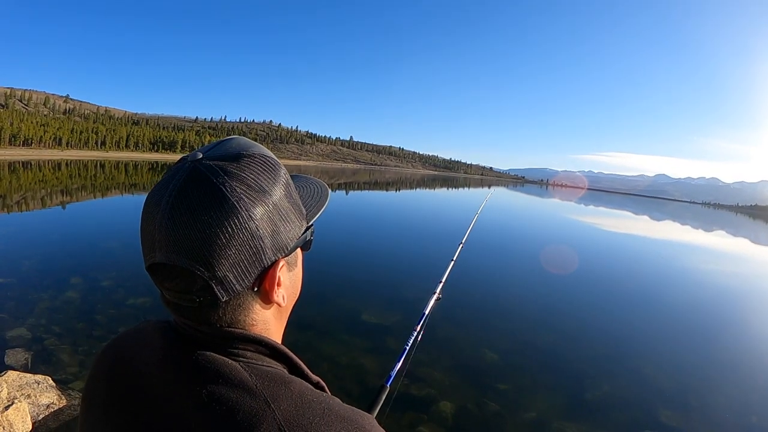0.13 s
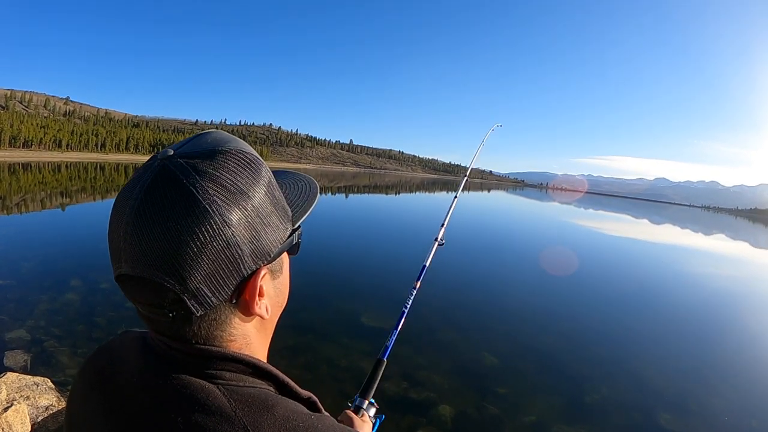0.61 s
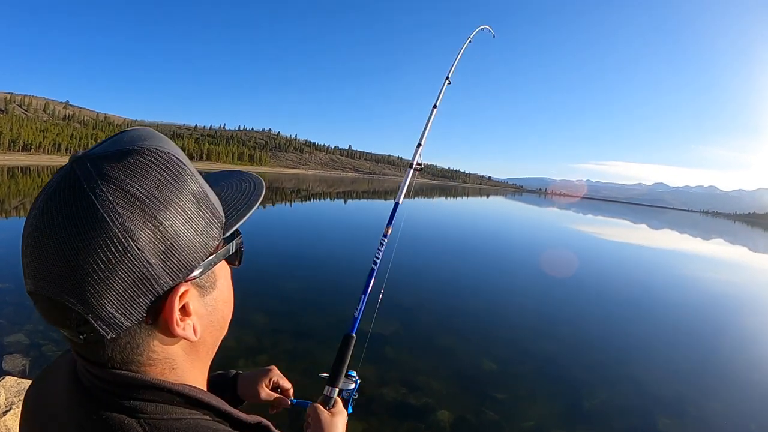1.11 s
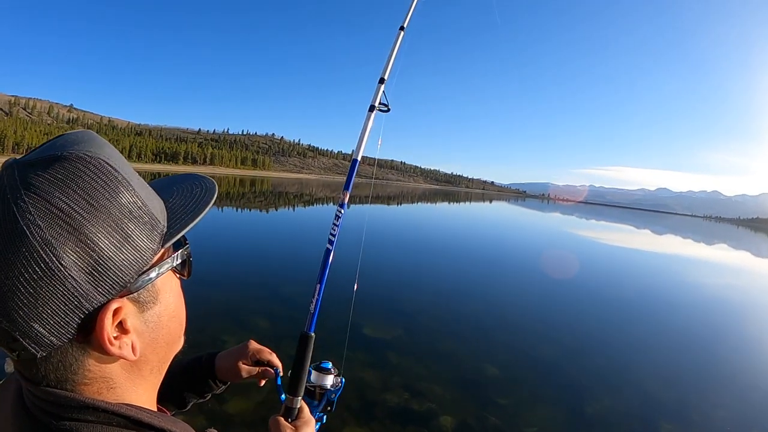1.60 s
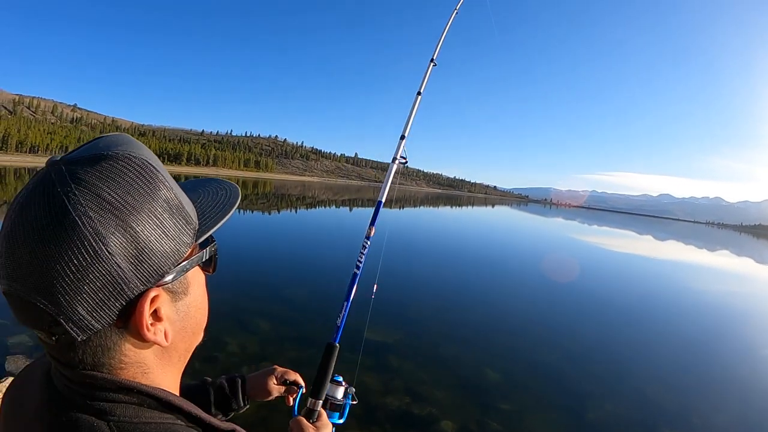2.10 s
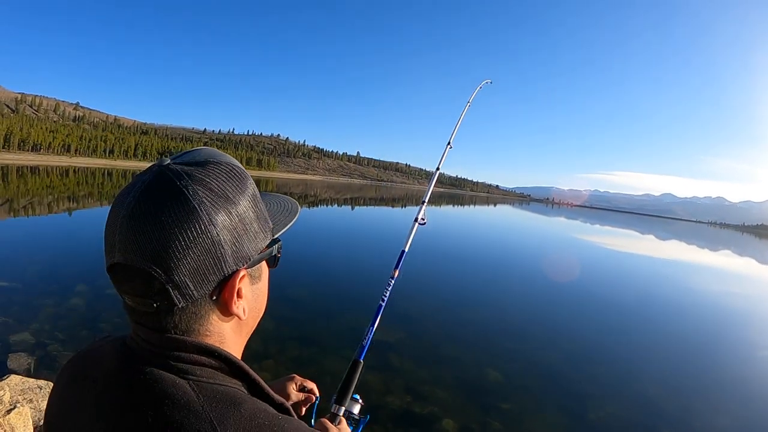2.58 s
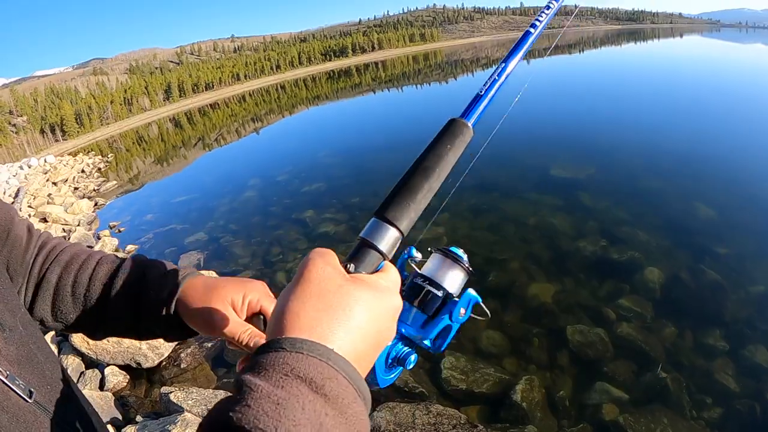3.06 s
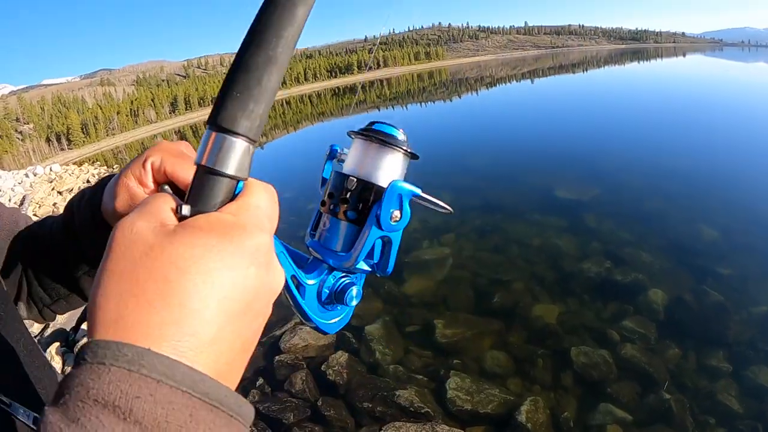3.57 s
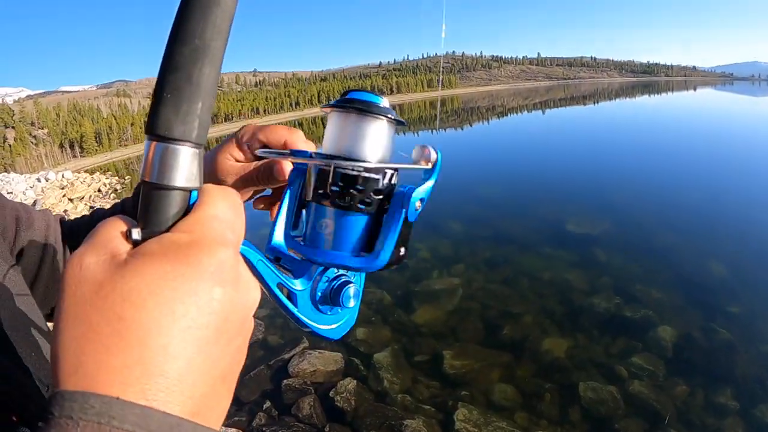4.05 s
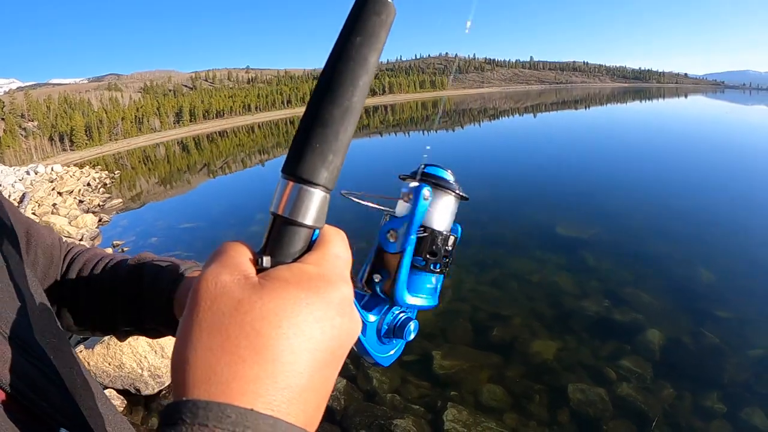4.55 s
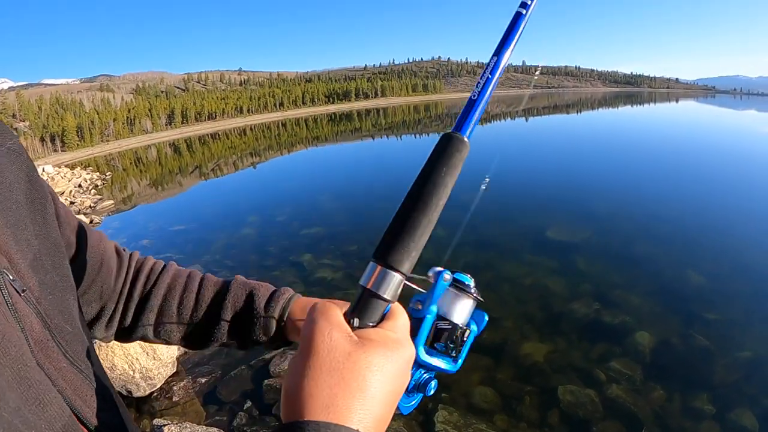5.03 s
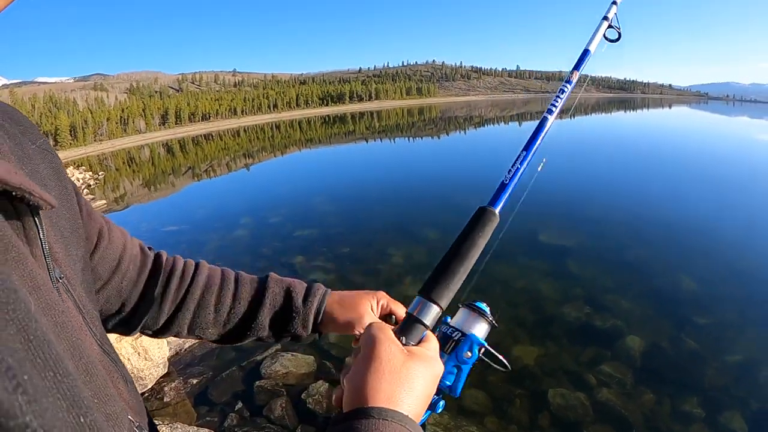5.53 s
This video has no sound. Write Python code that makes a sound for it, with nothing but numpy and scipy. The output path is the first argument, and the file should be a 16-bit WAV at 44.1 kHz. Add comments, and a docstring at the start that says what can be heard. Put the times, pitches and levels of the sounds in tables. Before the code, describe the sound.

By a calm lake, a spinning reel's drag clicker buzzes in two softer runs, a little distant, with dull sleeve rubbing. Small knocks follow, then the sound jumps close: two louder, brighter metallic runs with ringing and scraping. Afterwards a brief singing rub fades, and hands rustle and crank with light rattles and clicks. The microphone is close, slightly boxy, over quiet outdoor hush.

```python
"""A fishing reel's drag clicker sounds as a fish pulls line in four runs by a calm lake: its spring snaps over
the teeth of the turning spool, a struck resonator of bell, body and treble modes. The spring also scrapes and
squeals around each slip. The listening point is close to the reel from halfway on. Hands rub and crank
(shaped noise, short pings and knocks), with low rumble and one singing rub, over a quiet shore hush."""
import sys
import numpy as np
from scipy import signal
from scipy.io import wavfile
from scipy.ndimage import uniform_filter1d

SR = 44100
rng = np.random.default_rng(int(sys.argv[2]) if len(sys.argv) > 2 else 0)


def to_linear_factor(level_db):
    """Convert decibel levels (scalar or array-like) to linear amplitude factors."""
    exponent = np.asarray(level_db, float) / 20
    return 10 ** exponent


def inscribe(sig):
    """Save sig as 16-bit PCM at rate SR to the path in sys.argv[1].

    A 1-D sig is mono; a 2-D sig holds one channel per row.
    Samples are clipped to [-1, 1] before scaling.
    """
    pcm = np.round(np.clip(np.atleast_2d(sig).T, -1, 1) * 32767)
    wavfile.write(sys.argv[1], SR, pcm.astype(np.int16))


N = 249243


def read(points, hz):
    """Spectral interpolation: joins (f/Hz, value) points on a log-frequency axis."""
    f, value = np.transpose(points)
    return np.interp(np.log(hz + 1), np.log(f + 1), value)


def evened(x):
    """Normalisation of power: scales to rms 1."""
    return x / np.sqrt(np.mean(x ** 2) + 1e-20)


def add(mix, s, sound):
    """Superposition: adds a sound at a time in seconds."""
    part = mix[round(s * SR):][:len(sound)]
    part += sound[:len(part)]


def causal(points, size=2048):
    """Minimum phase: the Hilbert transform of the log gain gives the impulse response of a spectrum."""
    log_gain = np.log(to_linear_factor(read(points, abs(np.fft.fftfreq(4 * size, 1 / SR)))))
    return np.fft.ifft(np.exp(np.conj(signal.hilbert(log_gain)))).real[:size]


def noise(points, patchy_db, flicker_db, size):
    """Spectral shaping of Gaussian noise, with drifting patches and wide-band flicker; rms 1."""
    frames, hz = 4 * N // size + 5, np.fft.rfftfreq(size, 1 / SR)
    a, b, patches = rng.standard_normal((frames, len(hz), 3)).T
    patches = uniform_filter1d(patches, size=6, axis=0)
    patches = evened(uniform_filter1d(patches, size=8, axis=1))
    flicker = evened(uniform_filter1d(rng.standard_normal(frames), size=4))
    level_db = read(points, hz)[:, None] + patchy_db * patches + flicker_db * flicker
    z = (a + 1j * b) * to_linear_factor(level_db)
    return evened(signal.istft(z, nperseg=size, noverlap=3 * size // 4)[1][:N])


def narrow_band(hz, width_hz, edge_db):
    """Resonance curve: a spectral peak that falls to edge_db one width away on either side."""
    return [(hz - 8 * width_hz, -80), (hz - width_hz, edge_db), (hz, 0),
            (hz + width_hz, edge_db), (hz + 8 * width_hz, -80)]


# spectrum of the quiet shore: (f/Hz, relative level/dB)
HUSH_SPECTRUM = [(90, -22.5), (160, 10.5), (400, 0), (900, -10.5), (4500, -15.5), (16000, -29)]


def hush():
    """Stationary broadband noise: the quiet hush of the shore."""
    return to_linear_factor(-62) * noise(HUSH_SPECTRUM, patchy_db=1.5, flicker_db=4, size=1024)


# spectrum of the low handling rumble: (f/Hz, relative level/dB)
RUMBLE_SPECTRUM = [(20, -16), (45, -8), (100, 5), (130, -17.5), (300, -47)]


def rumble():
    """Low-frequency noise under a gain of 0.3, raised to full from about 2.6 s to 4.4 s, then lowered again."""
    t = np.arange(N) / SR
    gain = np.clip(np.minimum(t - 2.4, 4.6 - t) / .2, .3, 1)
    return to_linear_factor(-61) * noise(RUMBLE_SPECTRUM, patchy_db=2, flicker_db=4, size=2048) * gain


# strokes of hands and sleeves; rise and fall span 20 dB:
# (peak t/s, rise/s, fall/s, rustle level/dB, thud level/dB)
HAND_STROKES = [(.1, 0.75, 0.42, -58.5, -74.5), (.72, 0.99, 0.48, -49, -52), (1.03, .04, 0.068, -52, -50.5),
                (1.78, .3, 0.75, -59.5, -59), (2.31, 0.18, 4.5, -57.5, -53.5), (2.5, 0.16, 0.8, -50, -51),
                (2.728, 0.24, 1.34, -47.5, -50), (2.92, 0.9, 14, -64.5, -54.5),
                (3.463, 0.1, 0.22, -54, -47.5), (3.587, 0.09, 0.012, -45, -64),
                (3.81, 0.033, 0.051, -88, -51.5), (4.09, 0.39, 0.7, -57, -46), (4.548, 0.8, 1.8, -58, -70),
                (4.801, 0.14, 0.13, -51, -66), (4.93, .15, 1, -52, -55), (5.08, 0.33, 1.04, -58, -54),
                (5.25, 0.25, 0.16, -53, -50.5), (5.36, 0.24, 0.25, -53.5, -53),
                (5.49, 0.31, 0.83, -55, -55.5)]


def stroke_gains():
    """Exponential envelopes: each stroke swells and dies away, the strongest one ruling; rustle and thud gains."""
    peak, rise, fall, rustle_db, thud_db = np.transpose(HAND_STROKES)[:, :, None]
    t = np.arange(0, N + 64, 64) / SR
    shape_db = -20 * np.maximum((peak - t) / rise, (t - peak) / fall)
    return [np.interp(np.arange(N) / SR, t, to_linear_factor(db + shape_db).max(0)) for db in (rustle_db, thud_db)]


# spectrum of the brighter rubbing, also of the rattles: (f/Hz, relative level/dB)
RUSTLE_SPECTRUM = [(400, -52.5), (800, -7.5), (1350, 4.5), (1800, 1), (3000, -3.5), (3700, -4),
                   (4600, -4.5), (6000, -8), (10500, -18), (16000, -34)]


def rattles(count=24):
    """Shot noise: random impulses, in clumps, set off short pings of gears and bail at scattered pitches."""
    out, t = np.zeros(N), np.arange(SR // 50) / SR
    clump = to_linear_factor(7 * evened(uniform_filter1d(rng.standard_normal(N), size=SR // 30)))
    for hz in np.geomspace(1250, 11000, count):
        struck = rng.random(N) < 7 * clump / SR
        train = struck * to_linear_factor(3 * np.minimum(rng.exponential(size=N), 3))
        ping = np.sin(2 * np.pi * hz * t) * t * to_linear_factor(-60 * t / 0.016)
        out += to_linear_factor(read(RUSTLE_SPECTRUM, hz)) * signal.oaconvolve(train, ping)[:N]
    return evened(out)


# spectrum of the duller rubbing: (f/Hz, relative level/dB)
SLEEVE_SPECTRUM = [(350, -19), (600, -6.5), (1000, 5.5), (1500, 10.5), (2500, -3), (4500, -7.5),
                   (6500, -7.5), (10500, -29), (16000, -32.5)]


def rustle():
    """Friction noise: dull rubbing until 3.2 s and brighter after, with rattles of the cranked reel."""
    t = np.arange(N) / SR
    sleeve = noise(SLEEVE_SPECTRUM, patchy_db=3.2, flicker_db=3.5, size=512)
    bright = noise(RUSTLE_SPECTRUM, patchy_db=1.6, flicker_db=1.5, size=256)
    cranking_db = np.where(t > 4.72, -1.5, -8)
    return np.where(t < 3.2, sleeve, bright) + to_linear_factor(cranking_db) * rattles()


# spectrum of the low thudding: (f/Hz, relative level/dB)
THUD_SPECTRUM = [(90, -17), (170, 6.5), (320, 4.5), (500, 2), (750, -9), (1500, -30.5)]


def thuds():
    """Structure-borne noise: the low thudding under the hands."""
    return noise(THUD_SPECTRUM, patchy_db=2.5, flicker_db=2.5, size=1024)


def hands():
    """Amplitude modulation: the strokes govern rustle and thudding."""
    rubbing, thudding = stroke_gains()
    return rubbing * rustle() + thudding * thuds()


# the four runs of the fish, one curve each, first tooth at the first row:
# (t/s, spool speed/(teeth/s), nominal snap level/dB, rms over its first 8 ms)
FISH_RUNS = [
    [(0.0992, 16.45, -44.0), (0.189, 6.09, -42.0), (0.224, 37.42, -44.0), (0.304, 25.16, -46.0),
     (0.339, 55.58, -39.0), (0.354, 65.3, -43.0), (0.559, 58.8, -42.0), (0.629, 81.82, -42.0),
     (0.669, 76.49, -42.0), (0.744, 88.09, -38.0), (0.809, 65.86, -40.0), (0.939, 78.1, -37.0),
     (0.974, 62.88, -36.0), (1.014, 48.2, -43.0), (1.039, 39.69, -37.0), (1.099, 31.61, -39.0),
     (1.119, 28.84, -37.0), (1.1903, 15.02, -37.0)],
    [(1.4103, 17.18, -36.0), (1.44, 38.22, -37.0), (1.49, 65.85, -31.0), (1.54, 60.87, -37.0),
     (1.63, 29.73, -31.0), (1.725, 15.22, -39.0), (1.78, 26.93, -32.0), (1.8, 38.02, -37.0),
     (1.89, 55.53, -34.0), (1.91, 63.78, -36.0), (2.0296, 3.01, -39.0)],
    [(2.9359, 33.19, -33.0), (2.986, 43.78, -26.0), (3.066, 56.95, -27.0), (3.101, 45.07, -30.0),
     (3.166, 30.19, -24.0), (3.231, 52.5, -29.0), (3.281, 42.36, -29.0), (3.331, 47.68, -20.0),
     (3.391, 34.59, -29.0), (3.4297, 20.98, -26.0)],
    [(3.9032, 6.09, -27.0), (3.968, 45.89, -22.0), (4.038, 88.33, -27.0), (4.058, 86.66, -21.0),
     (4.078, 95.66, -23.0), (4.143, 101.92, -22.0), (4.158, 89.07, -27.0), (4.263, 93.49, -23.0),
     (4.373, 59.13, -26.0), (4.398, 43.58, -22.0), (4.4649, 15.01, -25.0)],
]
# ringing in each run, as grip and angle of the reel change: (bell level/dB, bell drift/(dB/s),
# treble level/dB, treble drift/(dB/s), share of a turn at which the rim modes are loudest)
RINGING_OF_RUN = [(-59, -21.5, -48.5, 12, 0.75), (-52.5, 5, -46, 0, 0.032), (-44.5, 12.5, -29, -6, 0.41),
                  (-36.5, 2.5, -31, -6, 0.85)]
# body of the snap in each run: (crack level/dB, share of a turn at which the crack is fullest,
# rim level/dB, rim drift/(dB/s))
BODY_OF_RUN = [(3.5, .03, -0.5, -10), (-3, 0.74, 0.5, -2), (-2, 0.7, 0.5, 19), (1.5, 0.17, 2.5, 4.5)]
# lone snaps outside the even turning, the first an extra bounce of the spring between two teeth: # (t/s, snap
# level/dB, bell level/dB, treble level/dB)
LONE_SLIPS = [(.3971, -49, -54, -62), (2.5042, -36.5, -42, -36.5), (2.6517, -39.5, -42, -45)]
TEETH_PER_TURN, RIM_SWELL_DB, CRACK_SWELL_DB = 13.4, 5, 6  # rim and crack swell and sink once a turn
FOLLOW = 0.29  # share of a snap's excess over the mean of its run that bell and treble follow


def teeth():
    """Integrated speed: each whole tooth passed is a slip; rows (t/s, snap, bell, treble, rim, crack/dB)."""
    rows = [np.pad(LONE_SLIPS, ((0, 0), (0, 2)))]
    for run, ringing, body in zip(FISH_RUNS, RINGING_OF_RUN, BODY_OF_RUN):
        bell_db, bell_drift, treble_db, treble_drift, rim_full = ringing
        crack_db, crack_full, rim_db, rim_drift = body
        knots, speeds, levels = np.transpose(run)
        t = np.arange(knots[0], knots[-1], 1 / SR)
        passed = np.cumsum(np.interp(t, knots, speeds)) / SR
        s = np.interp(np.arange(int(passed[-1]) + 1), passed, t)
        db = np.interp(s, knots, levels)
        excess = FOLLOW * (db - db.mean())
        from_mean_s = s - s.mean()
        turns = np.arange(len(s)) / TEETH_PER_TURN
        bell = bell_db + bell_drift * from_mean_s + excess
        treble = treble_db + treble_drift * from_mean_s + excess
        rim = rim_db + rim_drift * from_mean_s + RIM_SWELL_DB * np.cos(2 * np.pi * (turns - rim_full))
        crack = crack_db + CRACK_SWELL_DB * np.cos(2 * np.pi * (turns - crack_full))
        rows.append(np.transpose([s, db, bell, treble, rim, crack]))
    return np.concatenate(rows)


# crack of the spring beside the modes: (f/Hz, relative level/dB from afar, relative level/dB close by)
SNAP_SPECTRUM = [(624, 0.5, -4), (950, 14.5, 21.5), (1590, 25, 24), (2370, 21, 26), (4920, 18.5, 29.5),
                 (6040, 19.5, 8.5), (9860, 9, 16), (17000, 5, -9.5)]
CLOSE_FROM_S = 2.75  # the reel is heard from afar before this and close by after


def snap_of(close):
    """Impulse response: the broadband crack of the spring, from afar or close by."""
    hz, far_db, close_db = np.transpose(SNAP_SPECTRUM)
    return causal(np.transpose([hz, close_db if close else far_db]))


RIM_HZ = (3800, 4300)  # modes between these belong to the rim


def ring(modes, close, chance, spread_db, rim_db=0, detune=.0015):
    """Modal superposition: decaying sines, each strike exciting and tuning them a little differently."""
    t = np.arange(SR // 6) / SR
    hz, far_db, close_db, t60 = np.array(modes).T[:, :, None]
    level_db = (close_db if close else far_db) + spread_db * chance[:len(hz), None] - 60 * t / t60
    level_db = level_db + rim_db * ((hz > RIM_HZ[0]) & (hz < RIM_HZ[1]))
    sign = (-1) ** np.arange(len(hz))[:, None]  # neighbours start opposed, so close pairs swell before they die
    tuned_hz = hz * (1 + detune * chance[-len(hz):, None])
    return (sign * to_linear_factor(level_db) * np.sin(2 * np.pi * tuned_hz * t)).sum(0)


# modes of spool and spring: (f/Hz, relative level/dB from afar, relative level/dB close by, decay t60/s)
REEL_MODES = [(1702, 7, 0, 0.13), (1457, -17, -48, 0.04), (2395, -10, -10, 0.0055), (3280, -17, -12, 0.028),
              (3960, 1, 3, 0.012), (4120, -6.5, 8, 0.019), (4600, -29, 12, 0.0068), (5290, 4, 5, 0.0084),
              (5880, -8.5, 0, 0.012), (7450, -5.5, -16, 0.0064), (9650, -2.5, -37, 0.0037),
              (10420, -15, -12, 0.014), (10255, 1.5, 2, 0.0031), (12040, 3.5, -32.5, 0.0036),
              (13550, -9, -9, 0.009)]
BELL, BODY, TREBLE = REEL_MODES[:1], REEL_MODES[1:10], REEL_MODES[10:]


def through_reel(x, close, body_db, treble_db):
    """Source-filter principle: passes an excitation through the body and treble modes of the reel."""
    body, treble = (ring(modes, close, np.zeros(20), spread_db=0) for modes in (BODY, TREBLE))
    colour = to_linear_factor(body_db) * body / np.linalg.norm(body)
    colour += to_linear_factor(treble_db) * treble / np.linalg.norm(treble)
    return signal.oaconvolve(x, colour)[:N]


def scrape():
    """Friction excitation: a scrape swells into each slip, then bursts out louder and dies in milliseconds."""
    push, t = np.zeros(N), np.arange(SR // 16) / SR
    for s, db, *_ in teeth():
        db += 0 if s > CLOSE_FROM_S else 4  # the scrape is set 4 dB higher in the far part
        add(push, s - len(t) / SR, to_linear_factor(db - 60 * t / 0.092)[::-1])
        add(push, s, to_linear_factor(db + 16.5 - 60 * t / 0.045))
    hiss = push * rng.standard_normal(N)
    crack = to_linear_factor(-41) * signal.oaconvolve(hiss, snap_of(False))[:N]
    return through_reel(hiss, False, body_db=-29.5, treble_db=-25.5) + crack


# squeal of the spring on its treble modes: (f/Hz, width/Hz, level/dB relative to the snap's nominal treble)
SQUEAL_BANDS = [(10430, 260, -15), (13570, 220, -14.5)]


def squeal():
    """Narrow-band resonance: whistles grow as the spring bends up a tooth and die after it slips."""
    push, t, whistle = np.zeros(N), np.arange(SR // 16) / SR, np.zeros(N)
    for s, _, _, treble_db, *_ in teeth():
        treble_db += 0 if s > CLOSE_FROM_S else 3.5  # the squeal is set 3.5 dB higher in the far part
        add(push, s - len(t) / SR, to_linear_factor(treble_db - 60 * t / 0.052)[::-1])
        add(push, s, to_linear_factor(treble_db - 60 * t / 0.022))
    for hz, width_hz, db in SQUEAL_BANDS:
        whistle += to_linear_factor(db) * noise(narrow_band(hz, width_hz, -12), patchy_db=0, flicker_db=2, size=512)
    return push * whistle


TOOTH_SPREAD_DB = 1.6  # scatter from tooth to tooth
BOUNCE_FAR, BOUNCE_CLOSE = .45, 0.15  # strength of a bounce, as a share of the blow


def clicker():
    """Impact excitation: the spring drops off a tooth, chatters, may bounce, and sets the spool ringing."""
    out, snaps, clicks = np.zeros(N), (snap_of(False), snap_of(True)), teeth()
    first = round(SR / 125)  # levels refer to the first 8 ms
    chance, t = rng.standard_normal((len(clicks), 3, 300)), np.arange(300) / SR
    chance[:, 1] = evened(uniform_filter1d(chance[:, 1], size=2, axis=0))  # neighbouring teeth sound alike
    for (s, db, bell_db, treble_db, rim_db, crack_db), (chatter, mid, high) in zip(clicks, chance):
        close = s > CLOSE_FROM_S
        blow = np.diff(chatter * abs(chatter), prepend=0) * to_linear_factor(-60 * t / .008)
        blow *= .14 if close else .2
        blow[0] = -1
        bounce_at = int(np.clip(190 + 60 * high[53], 90, 299))  # in samples: 2 to 7 ms later
        blow[bounce_at] = (BOUNCE_CLOSE if close else BOUNCE_FAR) * max(high[54], 0)
        body = ring(BODY, close, mid, spread_db=3, rim_db=rim_db, detune=.005)
        crack = np.pad(snaps[close], (0, len(body) - len(snaps[close])))
        crack = crack * to_linear_factor(crack_db + TOOTH_SPREAD_DB * mid[50])
        body = signal.fftconvolve(blow, body + crack)
        treble = signal.fftconvolve(blow, ring(TREBLE, close, high, spread_db=3))
        bell = ring(BELL, close, high[60:], spread_db=0, detune=0)
        add(out, s, to_linear_factor(db + TOOTH_SPREAD_DB * high[52]) * body / np.std(body[:first]))
        add(out, s, to_linear_factor(treble_db + 2 * TOOTH_SPREAD_DB * high[50]) * treble / np.std(treble[:first]))
        add(out, s, to_linear_factor(bell_db + TOOTH_SPREAD_DB * high[51]) * bell / np.std(bell[:first]))
    no_bass = signal.butter(N=4, Wn=650, btype="high", fs=SR, output="sos")  # a small reel has no bass
    return signal.sosfilt(no_bass, out)


# small knocks of crank and bail, and the bright first slip of the third run:
# (t/s, nominal level/dB, centre f/Hz)
KNOCKS_AND_SLIP = [(0.163, -44, 1700), (2.297, -42.5, 1040), (2.36, -46, 4530), (2.36, -38.5, 1100),
                   (2.452, -34, 1720), (2.535, -36, 460), (2.565, -47, 4500), (2.705, -33.5, 1420),
                   (2.791, -42, 444), (2.841, -31, 1590), (2.842, -37.5, 4580), (2.859, -44, 1620),
                   (2.904, -38, 4320), (2.934, -21, 10330), (3.527, -38, 2400), (3.596, -32.5, 310),
                   (4.757, -41, 4440), (4.788, -44, 4410), (4.802, -44, 1476), (4.88, -47.5, 4130),
                   (4.906, -35, 4840), (4.935, -32, 4240), (5.015, -44, 4430), (5.035, -39.5, 4900),
                   (5.074, -41, 4820), (5.241, -32, 475), (5.261, -40, 390), (5.337, -44, 4530),
                   (5.361, -38, 1710), (5.388, -40, 4500), (5.453, -35, 4500), (5.463, -37.5, 1760),
                   (5.487, -29, 1750), (5.489, -38, 2614), (5.535, -44.5, 2490)]
CRACK_HZ = (700, 9000)  # those outside this range carry no crack


def knocks():
    """Damped oscillation: short noisy rings around one centre pitch, most with a small crack."""
    out, t, snap = np.zeros(N), np.arange(SR // 16) / SR, snap_of(False)
    for s, db, hz in KNOCKS_AND_SLIP:
        grit = rng.standard_normal(len(t))
        tone = np.sin(2 * np.pi * hz * t) * (.8 + 0.7 * evened(uniform_filter1d(grit, size=20)))
        tone *= np.minimum(t / 0.00071, 1)
        crack = evened(np.convolve(grit, snap)[:len(t)]) * to_linear_factor(-60 * t / .014)
        crack *= CRACK_HZ[0] < hz < CRACK_HZ[1]
        add(out, s, to_linear_factor(db - 60 * t / 0.033) * (0.84 * tone + 0.25 * crack))
    return out


def singing_rub():
    """Narrow-band friction noise: a rub that sings after the last run and fades."""
    start_s, length_s, fade_db_per_s = 4.47, 0.29, 14
    since = np.arange(N) / SR - start_s
    sing = noise(narrow_band(1760, 210, -9), patchy_db=0, flicker_db=0, size=2048)
    gate = np.clip(np.minimum(since / 0.017, (length_s - since) / 0.078), 0, 1)
    return sing * to_linear_factor(-50.5 - fade_db_per_s * since) * gate


# side part against the middle, while switched on: (f/Hz, relative level/dB)
SIDE_SPECTRUM = [(60, -7), (180, -15), (550, -12), (1200, -28), (2500, -14), (4970, -14), (9000, -14),
                 (10500, -19), (12000, -2), (14000, -4), (16000, -14)]


def side_of(mid):
    """Decorrelation: random phases give a small side part; below 10 kHz it switches on and off."""
    hz, _, z = signal.stft(mid, SR, nperseg=128)
    loose = np.exp(2j * np.pi * rng.random(z.T.shape).T)
    patches = uniform_filter1d(rng.standard_normal(z.T.shape).T, size=24, axis=1)
    patches = evened(uniform_filter1d(patches, size=16, axis=0))
    power = uniform_filter1d((abs(z) ** 2).sum(0), size=40)
    loud_db = 10 * np.log10(abs(power) + 1e-12)
    switched_on = (patches > .4) & (loud_db > np.median(loud_db))
    switched_on = switched_on | (hz[:, None] > 10000)
    loose *= np.where(switched_on, 1, to_linear_factor(-40))
    return signal.istft(z * loose * to_linear_factor(read(SIDE_SPECTRUM, hz))[:, None], nperseg=128)[1][:N]


def scene():
    """Mid/side superposition: all sources reach two close ports almost alike."""
    mid = hush() + rumble() + hands() + scrape() + squeal() + clicker() + knocks() + singing_rub()
    side = side_of(mid)
    return np.array([mid + side, mid - side])


# response of the microphone behind its housing: (f/Hz, gain/dB)
MIC_RESPONSE = [(30, -16), (105, -24.5), (165, -7), (5000, 0.5), (6500, -6.5), (8300, -15), (8850, -20),
                (9050, -34), (9250, -15), (9600, -13), (10300, 0.5), (11300, -10.5), (13600, -20.5),
                (14600, -29.5), (15400, -23), (16400, -54.5)]


def microphone(dry):
    """Linear filtering: the housing colours the sound at the microphone."""
    return signal.oaconvolve(dry, causal(MIC_RESPONSE)[None], axes=1)[:, :N]


def top_cut(x):
    """Nothing passes above the cut-off."""
    return signal.sosfilt(signal.butter(12, 16460, fs=SR, output="sos"), x)


def record(dry):
    """Linear filtering and gain: microphone colour, then a quick fade that reaches silence at 5.595 s."""
    fade = np.clip((5.595 - np.arange(N) / SR) / 0.0088, 0, 1)
    finished = microphone(dry) * fade
    return top_cut(finished)


dry = scene()
out = record(dry)
inscribe(out)
```